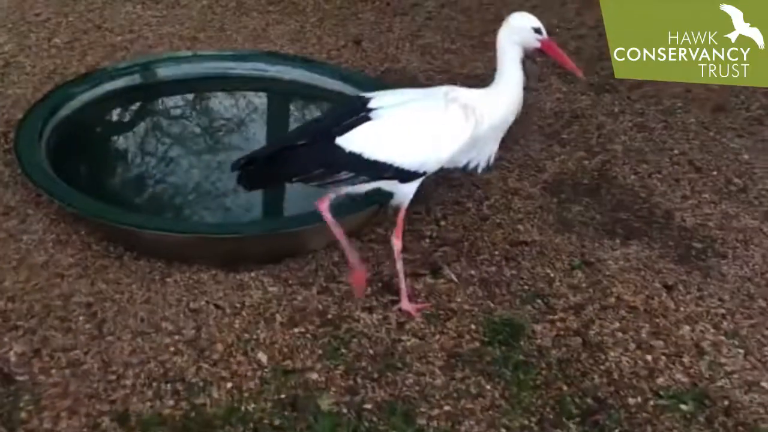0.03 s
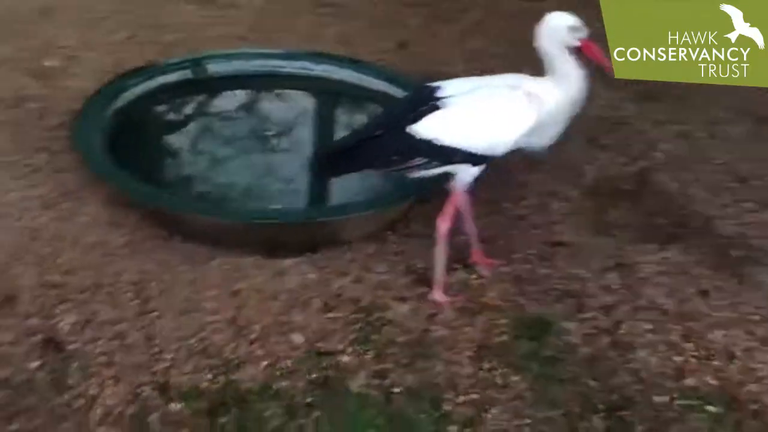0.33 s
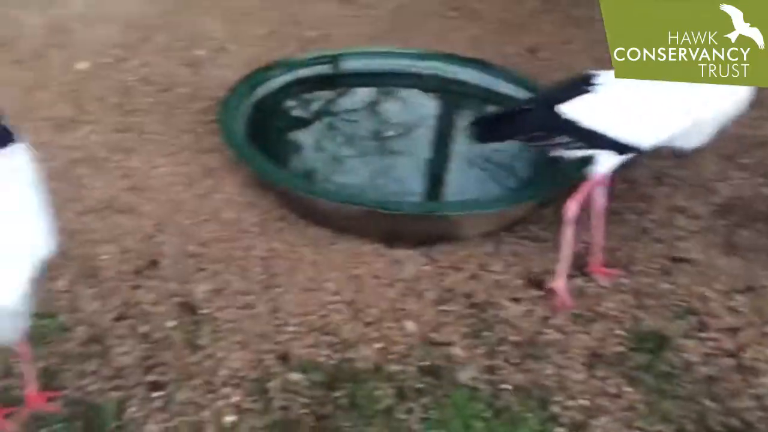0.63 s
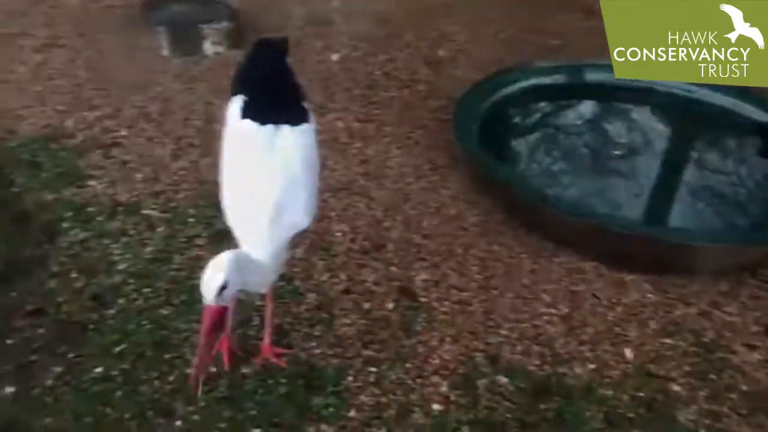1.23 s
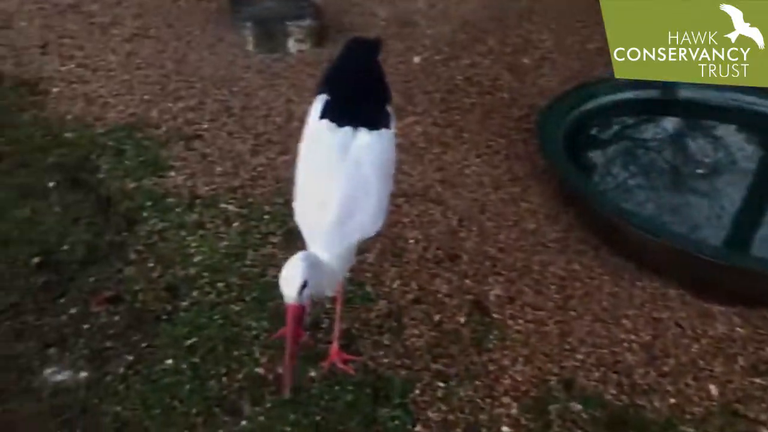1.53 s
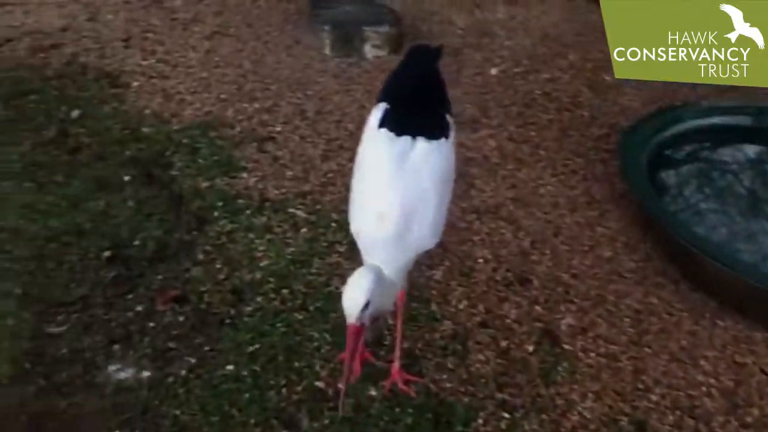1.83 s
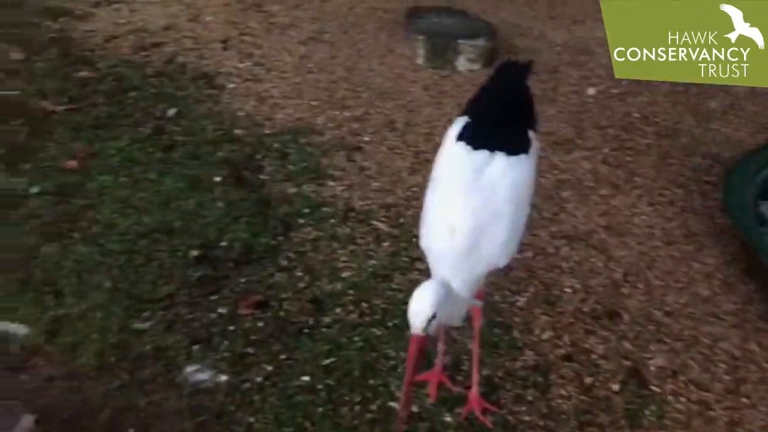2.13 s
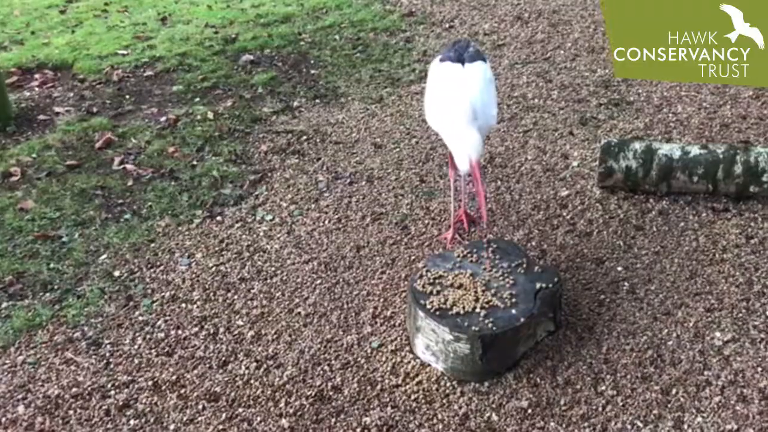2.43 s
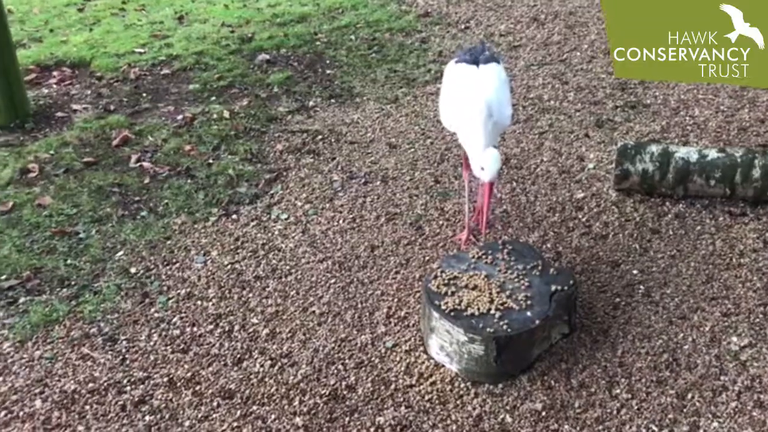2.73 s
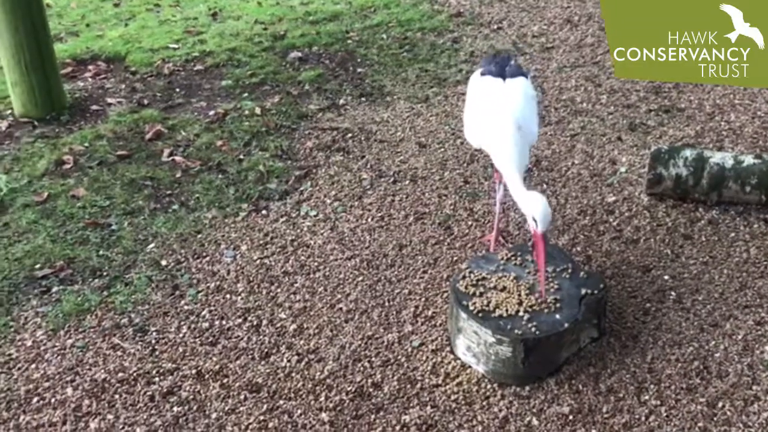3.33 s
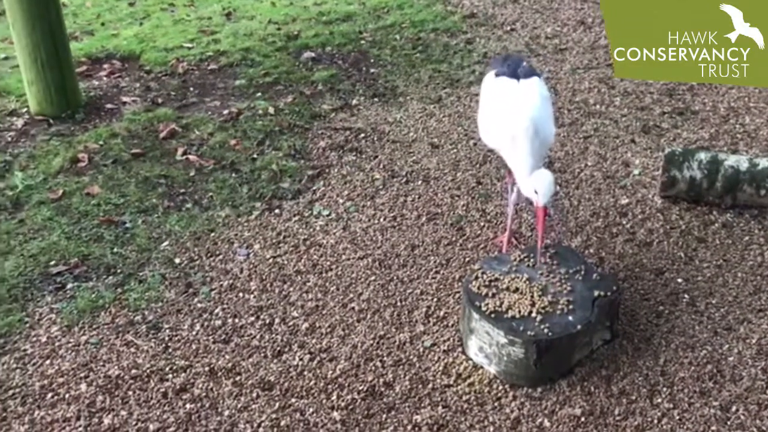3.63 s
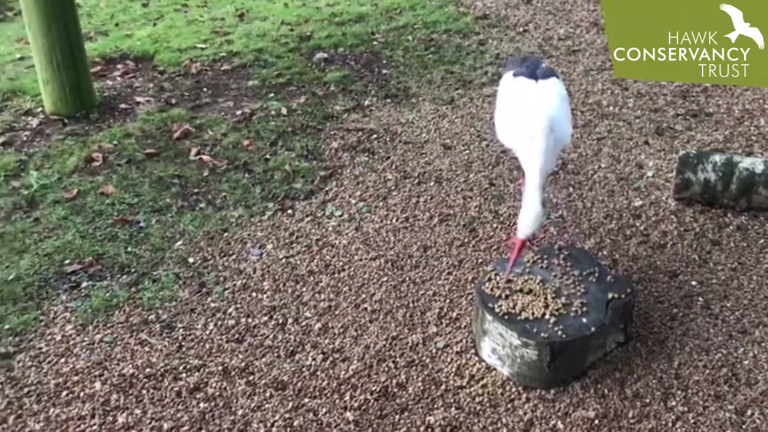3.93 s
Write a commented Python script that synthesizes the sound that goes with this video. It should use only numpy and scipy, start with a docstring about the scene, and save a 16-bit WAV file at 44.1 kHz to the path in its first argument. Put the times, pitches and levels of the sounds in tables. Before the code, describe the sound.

A stork clatters its bill in quick hollow claps, then picks quietly at feed.

```python
"""Stork bill clatter

A stork claps its bill about seven times a second: the hollow mandibles ring, rebound and meet again,
and the ground mirrors each clap. A distant bird whistles once over low outdoor rumble and air.
After a brief dropout the air is quieter, with short swishes and ticks as the stork picks at its feed."""
import sys
import numpy as np
from scipy import signal
from scipy.fft import rfft, irfft
from scipy.io import wavfile
from scipy.ndimage import uniform_filter1d

SR = 44100
rng = np.random.default_rng(int(sys.argv[2]) if len(sys.argv) > 2 else 0)


def file_out(sig):
    """Save sig as 16-bit WAV at sys.argv[1]."""
    # one column per channel
    cols = np.atleast_2d(sig).T
    # limit, then scale
    lim = np.clip(cols, -1, 1)
    pcm = np.round(lim * 32767).astype(np.int16)
    wavfile.write(sys.argv[1], SR, pcm)


N = 176400

# Noise spectra, shape only: f/Hz, level/dB
RUMBLE_SPECTRUM = [(20, -33), (35, -15), (48, 15.5), (60, 17), (72, 7), (100, -6.5), (200, -36.5)]
BUFFET_SPECTRUM = [(30, -10), (60, 17), (95, 13), (140, -3.5), (300, -41)]
CLATTER_AIR_SPECTRUM = [(100, 3.5), (160, -6), (300, -14.5), (500, -16), (900, -9.5), (1400, -17.5),
                        (2200, -25.5), (3500, -35.5), (6000, -34.5), (9000, -48), (12000, -64)]
FEEDING_AIR_SPECTRUM = [(100, 0), (190, -7.5), (280, -12), (430, -18), (700, -12), (850, -9), (1150, -14),
                        (1800, -21.5), (3500, -32.5), (7000, -40), (9500, -61), (11500, -68), (13000, -70)]
TICK_SPECTRUM = [(1000, -10), (3000, 7), (5000, 3), (8000, -3), (12000, -21)]
SWISH_SPECTRUM = [(700, -38), (1250, -9), (1570, 5.5), (1900, -7.5), (2370, 3), (2850, -3), (3500, 2.5),
                  (4300, -6), (5000, -11), (5500, -15), (7000, -7.5), (8900, -8), (10300, -24),
                  (11700, -17)]
SQUEAK_SPECTRUM = [(3000, -50), (4900, -14), (5350, -4), (5800, -20), (9000, -50)]
TAIL_SPECTRUM = [(200, -2), (700, 9.5), (1400, 0), (2050, 8), (2500, -5), (3200, 1), (4800, -10),
                 (6200, -14.5), (8500, -7), (12000, -16)]
CRACK_SPECTRUM = [(300, -17.5), (1000, -6), (2000, -2), (3500, 4), (4800, -1.5), (6500, 0), (9000, 1.5),
                  (12000, -7)]
# Wind buffets: t/s, width/s, level/dB
WIND_BUFFETS = [(2.98, 0.034, -45), (3.43, 0.023, -43.5), (3.78, 0.026, -45)]
# Bird note contour: t/s, f/Hz, level/dB
WHISTLE_CONTOUR = [(.01, 2520, -50), (.045, 2460, -56), (0.079, 2300, -53), (.125, 2040, -49)]
# Clear ticks of feed and grit: t/s, level/dB re TICK_DB
FEED_TICKS = [(0.842, -46), (1.349, -45.5), (2.4695, -39), (3.017, -44), (3.705, -51), (3.929, -45),
              (3.936, -46)]
# Feeding swishes: t/s, rise/s, fall/s, level/dB, treble/dB, squeak/dB
FEED_SWISHES = [(2.385, 0.019, 0.025, -38.5, -3, -30), (2.442, 0.021, 0.019, -45.5, -14, -30),
                (3.268, 0.014, 0.015, -62.5, -4, -20), (3.392, 0.013, 0.02, -53.5, -32, -30),
                (3.755, 0.019, 0.024, -59, 3, -5)]
# Bill modes at pitch BILL_HZ: f/Hz, relative level/dB, T60/s
BILL_MODES = [(490, -22, 0.0016), (756, 1, .014), (1060, -26, 0.0025), (1760, 6, 0.0024), (2027, -8, .020),
              (2084, -7.5, 0.023), (2854, -8.5, 0.0099), (3100, -15.5, .018), (3690, -9, 0.0083),
              (4414, -20, 0.021), (5400, -22.5, 0.017), (6070, -18, 0.018), (8350, -17, .010),
              (9340, -18, 0.0068)]
# Claps: t/s, level/dB re CLAP_DB, pitch/Hz, treble/dB, rebound delay/s, rebound/dB, ground echo lag/s
BILL_CLAPS = [(-.0200, 4, 2100, 2, 0.011, -10, .00195), (.1314, 0.5, 2106, -0.5, .0102, -7, .00203),
              (0.2762, 1.1, 2090, 0, 0.0085, -7, 0.0019), (0.42, 1, 2105, 0, 0.0091, -6.5, .00190),
              (.5688, 0.5, 2105, 0, 0.0096, -6.5, 0.0019), (.7190, 0, 2113, 1, 0.01, -7, 0.0018),
              (.8620, -1.5, 2087, 0, 0.011, -9, 0.0018), (1.0068, -7, 2084, -1, .0109, -7, .00180),
              (1.1453, -5, 2135, -0.5, 0.011, -9.5, 0.0017), (1.2785, -4, 2093, 0, .0085, -4.5, .00179),
              (1.4220, -3.5, 2056, -0.5, .0100, -7.5, 0.0018), (1.5611, -3.5, 2080, 1, 0.009, -9, 0.0017),
              (1.7026, -4, 2035, 0.5, .0099, -8, .00186), (1.8496, -5, 2140, -2, 0.008, -6, .00178),
              (1.9904, -3, 2146, 0, 0.0098, -5, 0.0017), (2.1399, -5.5, 2110, 0.5, .0087, -5.5, 0.0017)]

RUMBLE_DB, CLATTER_AIR_DB, FEEDING_AIR_DB = -48, -44, -47
TICK_DB, GRIT_PER_S = -6, 18
CLAP_DB, GROUND_DB = -13.5, -3
BILL_HZ, CONTACT_S, MODE_SPREAD_DB = 2080, 0.001201, 1.0
CRACK_DB, CRACK_RISE_S, CRACK_FALL_S = -14, 0.00091, 0.002
REBOUND_TREBLE_DB, REBOUND_PITCH_RATIO = -1, 0.95
DROPOUT_S = (2.218, 2.239)


def undb(db):
    """Decibels to gain."""
    return 10 ** (np.asarray(db) / 20)


def noise(spectrum, size):
    """Unit-rms noise shaped by (f/Hz, level/dB) points."""
    hz, db = np.array(spectrum, float).T
    bin_hz = np.maximum(np.arange(size // 2 + 1) * SR / size, 1)
    gain = undb(np.interp(np.log(bin_hz), np.log(hz), db))
    shaped = irfft(rfft(rng.standard_normal(size)) * gain, size)
    return shaped / shaped.std()


def butter(x, kind, hz, order=2):
    """Butterworth high- or low-pass."""
    return signal.sosfilt(signal.butter(order, hz, kind, fs=SR, output="sos"), x)


def drift(rate_hz):
    """Smooth random drift, spread near 1."""
    hold = int(SR / rate_hz)
    steps = np.repeat(rng.standard_normal(N // hold + 1), hold)
    return uniform_filter1d(steps, hold)[:N]


def decay(t, t60_s):
    """Exponential fall, 60 dB in t60_s."""
    return np.exp(-np.log(1000) * t / t60_s)


def add(out, start_s, sound):
    """Mix sound into out at start_s, cut to fit."""
    i = int(round(start_s * SR))
    part = sound[max(-i, 0):max(len(out) - i, 0)]
    out[max(i, 0):max(i, 0) + len(part)] += part


def rumble(swell_db=2.96):
    """Wavering low rumble with a few soft wind buffets."""
    t = np.arange(N) / SR
    buffets = sum(undb(db) * np.exp(-.5 * ((t - at_s) / width_s) ** 2)
                  for at_s, width_s, db in WIND_BUFFETS)
    bed = noise(RUMBLE_SPECTRUM, N) * undb(RUMBLE_DB + swell_db * drift(6.33))
    return bed + buffets * noise(BUFFET_SPECTRUM, N)


def air(spectrum, level_db, swell_db=0.53, flicker_db=2):
    """Outdoor air: two noise layers, common swell, independent flicker."""
    layers = sum(butter(noise(spectrum, N), "high", hz=78.7) * undb(flicker_db * drift(12))
                 for _ in range(2))
    return undb(level_db + swell_db * drift(2.94)) * layers / layers.std()


def whistle():
    """Distant bird: one falling note with slight pitch jitter."""
    t = np.arange(N) / SR
    at_s, hz, db = np.array(WHISTLE_CONTOUR).T
    pitch_hz = np.interp(t, at_s, hz) * (1 + .013 * drift(198))
    envelope = undb(np.interp(t, at_s, db, left=-200, right=-200))
    return envelope * np.sin(2 * np.pi * np.cumsum(pitch_hz) / SR)


def ticks(fall_s=0.0017, grit_floor_db=-55, grit_range_db=7):
    """Feed and grit: a few clear ticks among many tiny random ones."""
    t, out = np.arange(SR // 20) / SR, np.zeros(N)
    draws = rng.random((int(GRIT_PER_S * N / SR), 2))
    grit = [(when * N / SR, grit_floor_db + grit_range_db * strength) for when, strength in draws]
    for start_s, db in FEED_TICKS + grit:
        add(out, start_s, undb(TICK_DB + db) * noise(TICK_SPECTRUM, len(t)) * np.exp(-t / fall_s))
    return out


def swishes(grain_db=2.6):
    """The stork picks at its feed: short grainy swishes with a thin squeak."""
    t, out = np.arange(N) / SR, np.zeros(N)
    rub = noise(SWISH_SPECTRUM, N) * undb(grain_db * drift(220))
    squeak = noise(SQUEAK_SPECTRUM, N)
    bright = butter(rub, "high", hz=5040, order=4)
    dull = butter(rub, "low", hz=5000, order=4)
    for at_s, rise_s, fall_s, db, treble_db, squeak_db in FEED_SWISHES:
        width_s = np.where(t < at_s, rise_s, fall_s)
        swell = np.exp(-.5 * ((t - at_s) / width_s) ** 2)
        out += undb(db) * swell * (dull + undb(treble_db) * bright + undb(squeak_db) * squeak)
    return out


def far_tail(gain_db=-33, rise_s=0.0047):
    """Faint diffuse return of a clap from trees and fences, as decaying noise."""
    t = np.arange(SR // 2) / SR
    envelope = np.minimum(t / rise_s, 1) * decay(t, t60_s=0.39)
    return undb(gain_db) * envelope * noise(TAIL_SPECTRUM, len(t))


def near_scatter(scatter_db=-12):
    """Impulse response: direct path plus short scatter off gravel and nearby things."""
    t = np.arange(SR // 10) / SR
    response = rng.standard_normal(len(t)) * decay(t, t60_s=0.063)
    response *= undb(scatter_db) / np.linalg.norm(response)
    response[0] = 1
    return response


def bill_contact(pitch_hz, treble_db):
    """The mandibles meet: their horny edges crack, the hollow bill rings."""
    t = np.arange(N // 100) / SR
    hz, db, t60_s = np.array(BILL_MODES).T[:, :, None]
    tilt_db = treble_db * np.log2(hz / BILL_HZ) / 2
    gain = undb(db + tilt_db + MODE_SPREAD_DB * rng.standard_normal(hz.shape))
    mode_hz = hz * pitch_hz / BILL_HZ
    modes = gain * decay(t, t60_s) * np.sin(2 * np.pi * mode_hz * (t - CONTACT_S))
    ring = modes.sum(0) * np.minimum(t / CONTACT_S, 1)
    burst = np.minimum(t / CRACK_RISE_S, 1) * np.exp(-np.maximum(t - CRACK_RISE_S, 0) / CRACK_FALL_S)
    crack = undb(CRACK_DB + treble_db) * burst * noise(CRACK_SPECTRUM, len(t))
    return ring + crack


def clatter():
    """Each clap: a contact and a softer, lower rebound, both mirrored by the ground."""
    out = np.zeros(N)
    for start_s, db, pitch_hz, treble_db, rebound_s, rebound_db, ground_lag_s in BILL_CLAPS:
        clap = np.zeros(SR // 10)
        add(clap, 0, bill_contact(pitch_hz, treble_db))
        rebound = bill_contact(pitch_hz * REBOUND_PITCH_RATIO, treble_db + REBOUND_TREBLE_DB)
        add(clap, rebound_s, undb(rebound_db) * rebound)
        add(clap, ground_lag_s, undb(GROUND_DB) * clap)
        near = signal.fftconvolve(butter(clap, "high", hz=340), near_scatter())
        gain = undb(CLAP_DB + db)
        add(out, start_s, gain * near)
        add(out, start_s, gain * far_tail())
    return out


def scene():
    """Clatter, brief dropout, feeding; rumble and ticks under both parts. Mono."""
    t = np.arange(N) / SR
    background = rumble() + ticks()
    before = uniform_filter1d(1. * (t < DROPOUT_S[0]), size=90)  # 2 ms ramps
    after = uniform_filter1d(1. * (t > DROPOUT_S[1]), size=90)
    clattering = clatter() + whistle() + air(CLATTER_AIR_SPECTRUM, CLATTER_AIR_DB) + background
    feeding = swishes() + air(FEEDING_AIR_SPECTRUM, FEEDING_AIR_DB) + background
    return (before * clattering + after * feeding)[None]


def record(dry):
    """Steep elliptic low-pass."""
    cutoff_hz = 11750
    return signal.sosfilt(signal.ellip(8, .2, 70, cutoff_hz, fs=SR, output="sos"), dry)


dry = scene()
out = record(dry)
file_out(out)
```